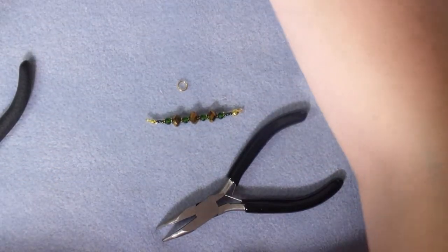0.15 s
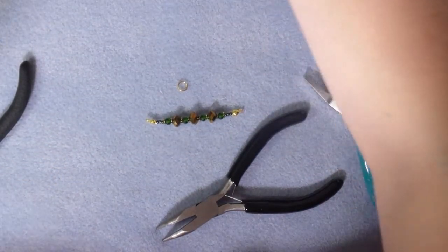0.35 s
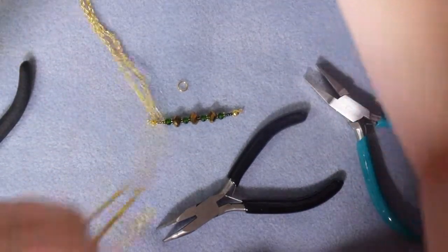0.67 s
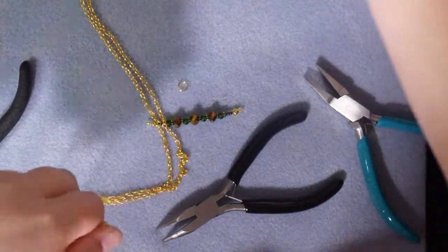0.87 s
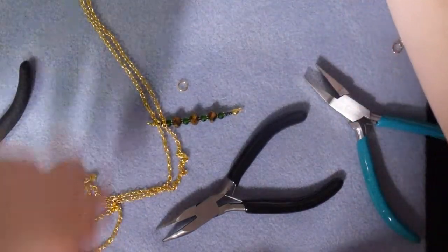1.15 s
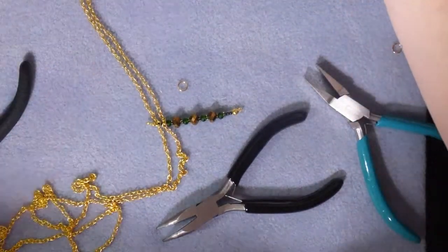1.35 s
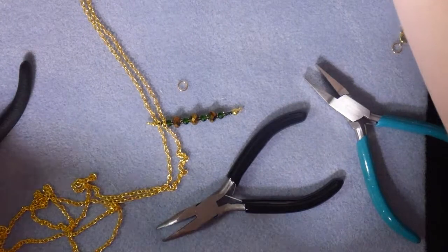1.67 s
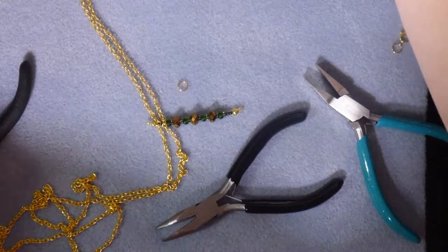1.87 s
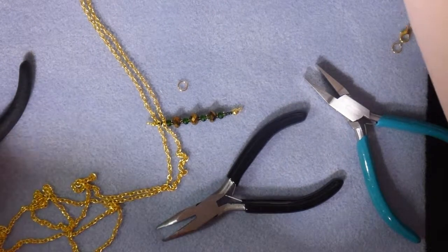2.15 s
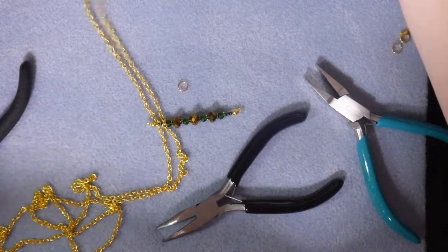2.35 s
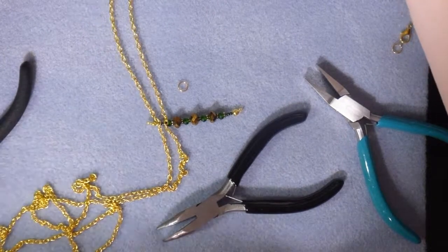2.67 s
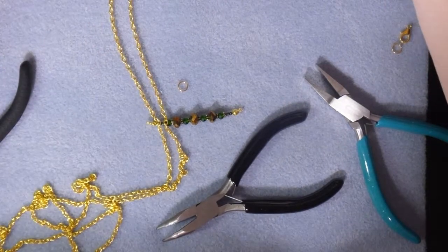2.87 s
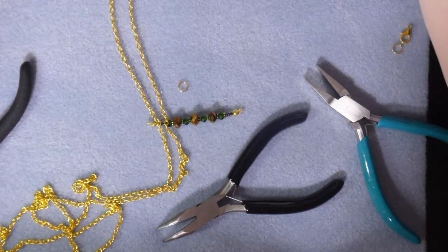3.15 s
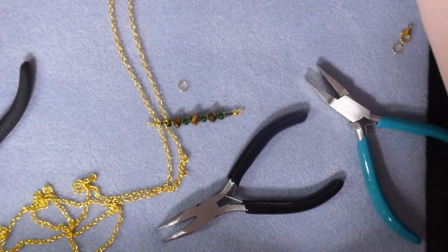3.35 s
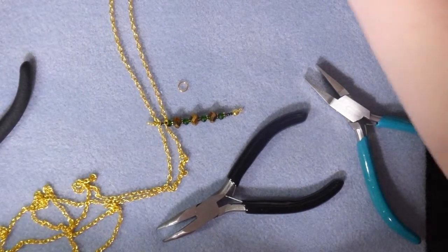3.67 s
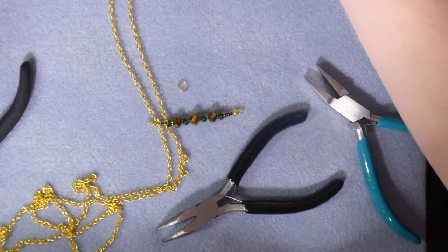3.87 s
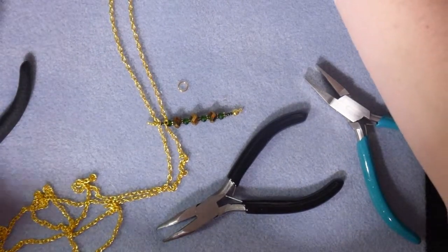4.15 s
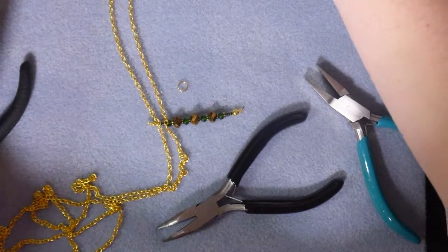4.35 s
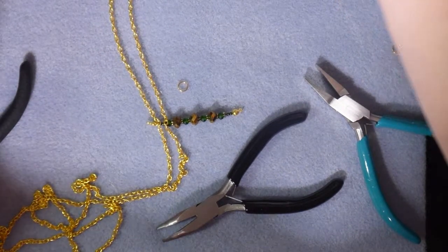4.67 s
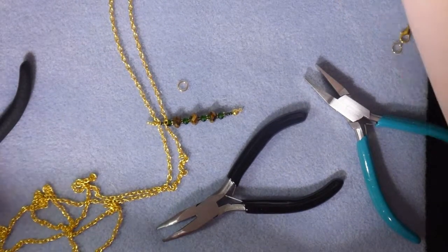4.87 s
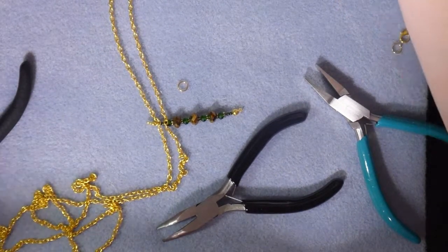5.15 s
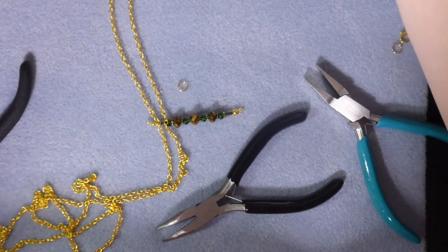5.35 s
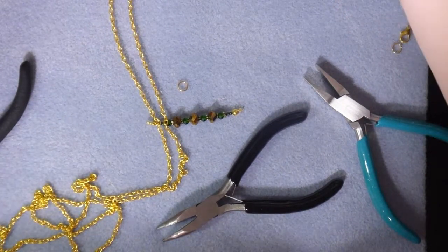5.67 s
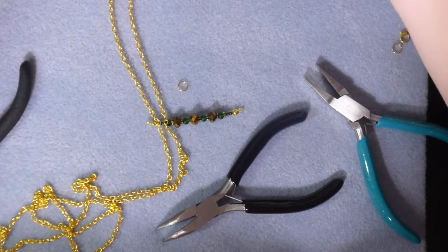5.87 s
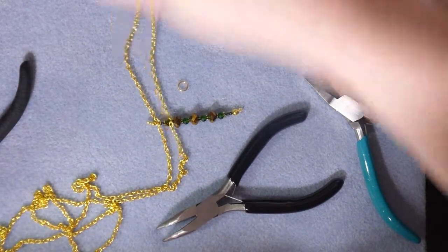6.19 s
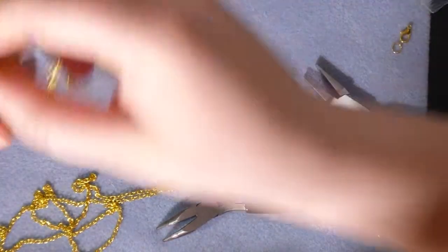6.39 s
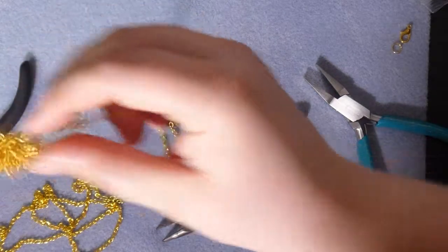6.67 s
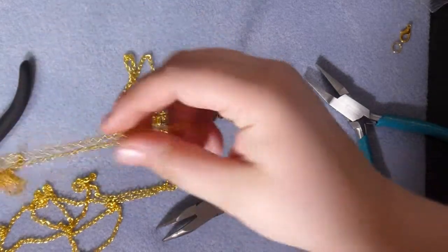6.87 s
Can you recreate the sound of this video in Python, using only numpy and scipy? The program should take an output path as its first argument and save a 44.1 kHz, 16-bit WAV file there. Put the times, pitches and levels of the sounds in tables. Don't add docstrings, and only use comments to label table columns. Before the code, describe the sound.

Someone handles a fine metal chain on a padded wooden table. Dense tiny ticks, cloth hiss and sleeve brushing mix with hollow taps from hands and tools. The busy start gives way to sparser shuffling; a rattle and hard knock come midway, then more clinking, a sharp snap and a burst of knocks. The end is mostly quiet room air, heard close and dry with faint hiss.

```python
import sys
import numpy as np
from scipy import signal
from scipy.io import wavfile
from scipy.ndimage import uniform_filter1d

SR = 44100
rng = np.random.default_rng(int(sys.argv[2]) if len(sys.argv) > 2 else 0)


def gain_from_decibels(decibels):
    exponent = np.asarray(decibels, float) / 20
    return 10 ** exponent


def pcm_store(signal):
    levels = np.round(np.clip(np.atleast_2d(signal), -1, 1) * 32767)
    wavfile.write(sys.argv[1], SR, levels.astype(np.int16).T)


N = 309582

# (frequency [Hz], level [dB per Hz])
AIR_COLOUR = [(15, -54), (25, -13), (59, -19.5), (137, 3), (354, -0.5), (607, 3.5), (2410, -7), (3720, -10),
              (8140, -13.5), (10400, -15), (11600, -17.5), (13200, -36), (14800, -19), (16000, -73)]
# (frequency [Hz], correlation [-1 to 1])
AIR_LIKENESS = [(60, 0.82), (240, 0.3), (950, -0.88), (3770, 0.009), (15000, 0.99)]
# (frequency [Hz], t60 [s])
ROOM_DECAY = [(200, 0.033), (700, 0.17), (2500, 0.1), (6000, 0.074), (12000, 0.072)]
# (frequency [Hz], level [dB per Hz])
LINK_COLOUR = [(1500, -46.5), (2900, -20), (3600, -21.5), (5270, -14), (7600, -14.5), (9100, -9.5),
               (9830, -3), (11800, -5.5), (13500, -18), (15000, -34), (15800, -41), (16000, -71)]
# (frequency [Hz], level [dB per Hz])
CLOTH_COLOUR = [(2200, -16), (3000, -9), (3450, 4), (4300, 5), (5500, -1.5), (7860, -3), (9000, -2),
                (11700, -37)]
# (frequency [Hz], level [dB per Hz])
SLEEVE_COLOUR = [(500, -18), (900, -6.5), (1200, -5), (1400, -6.5), (1750, -11), (2500, -15), (3200, -13.5),
                 (5000, -72.5)]
# (frequency [Hz], level [dB per Hz])
SNAP_COLOUR = [(290, -42.5), (500, -6.5), (785, -14.5), (936, -5.5), (1060, -8), (1200, -7.5),
               (2820, -19.5), (3580, -9), (5410, -17.5), (6780, -20), (10000, -33), (13000, -31),
               (22000, -120)]
TABLE_MODE_HZ = [118, 155, 225, 285, 350, 495, 585, 675, 810, 940, 1070, 1200, 1380, 1520]
# (level [dB], t60 [s])
TABLE_MODES = [(-33, 0.52), (-10, 0.17), (-10.5, 0.25), (-8.5, 0.13), (6, 0.088), (4.5, 0.028), (3, 0.073),
               (2.5, 0.079), (-7, 0.085), (-2.5, 0.093), (-9, 0.075), (-15.5, 0.087), (-21.5, 0.074),
               (-30, 0.053)]
# (peak time [s], rise [s], fall [s], links [dB])
CHAIN_SHAKES = [(.645, 0.0099, 0.026, -42), (.826, 0.032, 0.11, -40.5), (2.636, 0.025, 0.084, -38),
                (2.84, 0.14, 0.084, -40), (3.335, 0.048, 0.13, -26), (3.59, 0.051, 0.24, -57),
                (4.075, 0.3, 0.037, -47.5), (2.96, .1, 0.6, -63), (5.07, .1, .1, -41),
                (5.15, 0.081, 0.1, -36.5), (5.31, 0.028, 0.043, -41), (5.56, 0.12, 0.11, -42.5),
                (5.645, 0.064, 0.075, -29), (5.73, 0.15, 0.14, -28), (6.04, 0.15, 0.075, -46.5)]
# (peak time [s], rise [s], fall [s], links [dB], cloth [dB re links])
CHAIN_DRAGS = [(.001, .05, 0.22, -36, -2.5), (.24, 0.13, 0.26, -45, -12), (.33, .2, 0.1, -44, 1),
               (.46, 0.16, 0.18, -47, -7), (.745, 0.11, 0.16, -42.5, -2.5), (1.05, 0.68, 0.19, -49, -9.5),
               (1.55, 1, .14, -58.5, -6), (1.92, 0.084, 0.24, -46.5, -5.5), (2.33, 0.066, 0.59, -40, -5.5),
               (2.5, .42, .13, -37, -4), (3.942, 0.054, 0.27, -47.5, -7), (4.442, 0.23, 0.24, -50.5, 2.5),
               (4.555, 0.085, 0.34, -42, -4.5), (4.697, 0.078, 0.12, -40, -4.5),
               (4.83, 0.22, 0.35, -36, -9), (5.892, 0.37, 0.12, -30, -8.5), (6.87, 0.82, 0.71, -51.5, -7)]
# (peak time [s], rise [s], fall [s], rubbing [dB])
ARM_LEANS = [(.09, 0.37, 0.19, -32.5), (.33, 0.24, 0.093, -33), (.43, 0.052, 0.15, -42.5),
             (1.04, 0.068, 0.062, -40), (1.93, 0.099, 0.78, -44.5), (3.745, .02, .12, -33),
             (3.8, 0.18, 0.038, -47), (3.495, .05, .06, -47), (3.94, 0.026, .1, -40),
             (4.08, 0.26, 0.06, -47), (5.98, 0.15, 0.14, -40)]
# (peak time [s], rise [s], fall [s], rubbing [dB], sleeve [dB re rubbing])
ARM_SWEEPS = [(.002, .05, 0.061, -40.5, 2.5), (.6, 1, 0.45, -59.5, 6), (.76, 0.13, 0.088, -50, -6),
              (.95, 1, 0.71, -60.5, -2), (1.58, 0.29, 0.61, -63, -12), (1.91, .06, .15, -54, 6),
              (2.33, .2, .1, -52, 4), (2.525, .1, .08, -50, 5), (5.87, .06, .06, -52, 10),
              (2.486, 0.41, 0.21, -40.5, -3.5), (2.746, 0.13, 0.36, -51, -5.5),
              (3.34, 0.078, 0.18, -45, -3.5), (4.3, 0.12, 0.37, -49, -2.5), (4.46, 0.36, 0.25, -48, -4),
              (4.555, 0.12, 0.27, -50, 7.5), (4.72, 0.14, 0.59, -49.5, 4), (5.134, 0.047, 0.08, -52.5, 2.5),
              (5.5, 0.2, 0.22, -61.5, 3), (5.66, 0.17, 0.51, -50, 3), (5.899, 0.13, 0.063, -40, 1),
              (6.12, 0.18, 0.22, -68, 11), (6.85, 0.64, 0.94, -67.5, 3)]
# (time [s], level [dB], centre [Hz])
TOOL_SLIDES = [
    [(0, -50, 4400), (.15, -55.5, 4470), (.33, -53, 4470), (.5, -55, 4570), (.68, -55, 4520)],
    [(.3, -62, 1990), (.68, -63, 2057)],
    [(5.5, -61, 3090), (6.22, -59, 3055)],
    [(6.03, -58, 3900), (6.22, -67, 3800)],
    [(4.6, -55, 1250), (5.05, -58.5, 1249)],
]
TOOL_SLIDE_WIDTHS = [277, 150, 200, 350, 90]
# (time [s], peak [dB], hardness [dB per octave], damping [factor], deep boom [dB])
HARD_RAPS = [(0.014, -25, -1, 0.73, 1), (.042, -30, 1, .6, -5), (0.054, -22, 0, 0.84, -3),
             (0.066, -22, -0.5, 0.42, -5.5), (.084, -25, 2, .5, -6), (0.104, -24, 2, 0.46, -3),
             (0.142, -23.5, -2, 0.5, 0), (.158, -24.5, 0, .8, 1), (.27, -28, -1, .8, -1),
             (.425, -34, 2, 1.2, 1), (1.0157, -25.5, 3.5, 1.1, 9), (1.038, -25.5, 0, 1.15, 8),
             (1.565, -47.5, 1, 0.9, -1), (1.9, -37, 10, 0.76, 7), (2.0766, -18, 1, 1.5, -0.5),
             (2.2, -34.5, 3.5, 0.46, 2), (2.45, -35, 4, 0.59, 6), (2.522, -32.5, 10, .7, 3),
             (2.62, -42.5, 2, 1.1, -4), (2.718, -45, 0, 1.2, -0.5), (3.264, -46, 1, 1.3, 0),
             (3.672, -51, -3, .8, 0), (3.7155, -9, 2.5, 1.47, -7.5), (3.848, -43, 1, 1.7, -2),
             (3.861, -35, -9.5, 1.8, -2), (3.927, -21, 3, 2.5, -5), (4.173, -43, 2.5, 1.3, 0),
             (4.296, -23.5, -3.5, 1.5, 0.5), (4.314, -27, -2, 0.84, -0.5), (4.745, -37, 8, 0.56, 2),
             (5.132, -39, 5, 0.82, -0.5), (5.555, -40, 6, 1.2, -4), (5.61, -40, 3, 1.2, -3),
             (5.676, -36.5, 4, 0.95, -3), (5.798, -42, 6, 0.89, -3), (5.873, -16, 3.5, 0.82, -1),
             (5.894, -24, 6, 2.6, 3), (5.935, -15.5, 3, 1.56, -3), (6.063, -30.5, 3, 2.1, -4),
             (6.787, -43, 6, 4.4, 0)]
# (time [s], peak [dB], hardness [dB per octave])
SOFT_BUMPS = [(0.222, -24, -5), (0.304, -21, -5), (0.322, -25, -4), (0.362, -33, -11), (0.384, -24.5, -7),
              (0.684, -35, -2.5), (.993, -33.5, -3.5), (.972, -43, -7), (1.687, -28, -8.5),
              (1.782, -33.5, -10), (1.968, -25.5, -7.5), (3.21, -42.5, -3.5), (3.314, -19.5, -6),
              (4.595, -37, -7)]
# (time [s], peak [dB], frequency [Hz], t60 [s])
TABLE_THUDS = [(1.692, -28.5, 226.6, 0.18), (2.1, -36, 336, 0.13), (1.972, -34, 324, 0.32),
               (3.318, -9.5, 306, 0.039), (3.7195, -17, 675, 0.056), (3.72, -19, 935, 0.065),
               (3.726, -22, 800, .08), (3.724, -24, 500, .09), (3.73, -33, 1190, .09),
               (3.934, -30, 880, .06), (.05, -24, 670, .15), (.085, -25, 680, .12), (.322, -24, 290, .08),
               (5.878, -25, 280, .08), (3.722, -24, 298, 0.08), (3.863, -34, 210, 0.083),
               (3.32, -20, 480, 0.07), (1.7, -34, 520, 0.047), (3.93, -12, 658, 0.022),
               (2.08, -26, 617, 0.059), (4.595, -36, 304, 0.067), (.365, -19.5, 330, 0.11),
               (1.695, -37, 115.6, 0.28)]
# (time [s], peak [dB], t60 [s])
LINK_TICKS = [(0.4695, -32, 0.05), (0.4895, -28.5, 0.04), (.4998, -26, 0.054), (0.5436, -33.5, 0.05),
              (0.639, -40, 0.059), (.823, -31, .05), (0.8574, -31, 0.04), (.878, -33, .04),
              (1.1018, -31, 0.05), (1.112, -36, .04), (1.187, -41, .05), (1.947, -38, .05),
              (2.054, -35.5, 0.048), (2.17, -31.5, 0.086), (2.316, -31.5, .06), (2.6172, -36, .05),
              (2.65, -30, .05), (2.7412, -34, .04), (2.816, -32, .05), (2.845, -31, .04),
              (3.13, -39, 0.024), (3.2725, -42, .04), (3.278, -38, .04), (3.2947, -33, .04),
              (3.312, -25, .04), (3.334, -22, .04), (3.361, -14.5, 0.04), (3.377, -22, .05),
              (3.395, -27, .05), (3.431, -25.5, 0.07), (3.44, -25, 0.083), (3.477, -32.5, 0.047),
              (3.57, -44, .05), (3.5965, -40, 0.061), (3.7954, -42, 0.07), (3.843, -44.5, .04),
              (3.9098, -32.5, 0.071), (4.24, -46, 0.056), (4.427, -37, .06), (4.5358, -25.5, 0.049),
              (4.599, -32, .06), (4.668, -31, .04), (4.693, -27, 0.044), (4.8647, -18, 0.054),
              (4.877, -19.5, 0.053), (4.939, -33, .04), (4.975, -30, .04), (5.07, -26, 0.074),
              (5.116, -22, 0.04), (5.125, -21.5, .05), (5.1352, -19, 0.059), (5.2704, -42, .04),
              (5.305, -25, 0.037), (5.4655, -35, 0.052), (5.4914, -39, .05), (5.528, -29.5, 0.057),
              (5.614, -13, 0.053), (5.681, -21, .06), (5.686, -15, .09), (5.799, -21.5, .06)]
# (time [s], bright peak [dB], dull part [dB re peak], ring [Hz], t60 [s])
CHAIN_STRIKES = [(0.2071, -19.5, -12, 4280, 0.09), (0.417, -26.5, -8, 4540, 0.086),
                 (0.682, -7, -16.5, 6400, 0.17), (0.8111, -36, -3.5, 4100, 0.37),
                 (1.039, -29.5, -8, 6500, 0.055), (1.546, -45, 5.5, 3060, 0.14),
                 (2.632, -30, -8.5, 3890, 0.11), (2.7555, -26, -9.5, 5500, 0.069),
                 (3.349, -17, -14.5, 5800, 0.045), (3.719, -37.5, 2.5, 2880, 0.096),
                 (4.299, -26, 7.5, 5500, 0.034), (4.3106, -35, 14.5, 4900, 0.1),
                 (4.406, -46.5, 16, 3500, 0.1), (4.7468, -36, 11, 3400, 0.048),
                 (4.814, -28, -10, 3700, 0.072), (5.0583, -32, -11, 4370, 0.055),
                 (5.2943, -14, -19.5, 6060, 0.048), (5.556, -6.5, -23, 4400, 0.043),
                 (6.001, -30.5, -2, 4140, 0.13), (6.026, -23.5, -7.5, 6960, 0.13)]
# (time [s], peak [dB],
# frequency [Hz], t60 [s])
PINGS = [(3.7195, -46, 1920, .04), (3.7195, -47, 2250, .03), (3.7195, -45, 2600, 0.027),
         (3.7195, -45, 3600, .02), (2.081, -54, 2750, .03), (2.081, -46, 4400, .03),
         (1.9, -56, 2000, .03), (2, -56, 1500, .03), (2.633, -44.5, 3890, .06),
         (4.3, -19.5, 3400, 0.03), (4.3, -23, 3720, .035), (4.2995, -20.5, 4100, 0.024),
         (4.3, -24, 5150, .025), (4.2992, -28.5, 6330, 0.019), (4.7475, -26.5, 3480, 0.028),
         (4.75, -34.5, 1620, 0.03), (4.748, -33, 1200, .04), (5.559, -29.5, 4180, 0.03),
         (5.615, -30.5, 4400, 0.027), (5.685, -33.5, 3020, 0.044), (5.74, -38, 4050, .08),
         (5.8, -38, 4350, .08), (5.864, -36, 4150, 0.1), (5.891, -33, 4200, 0.096)]

STROKE_DROP_DB, STROKE_ROUND = 22, 1.162
SHAKE_CLOTH_DB, LEAN_SLEEVE_DB = -16, -14.5
REST_LINKS_DB, REST_CLOTH_DB, REST_RUB_DB, REST_SLEEVE_DB = -72, -74.5, -70, -83
BOOM_HZ, BOOM_OCTAVES = 345, .2


def evened(x):
    return x / np.sqrt(np.mean(x ** 2) + 1e-20)


def read(points, hz):
    f, value = np.transpose(points)
    return np.interp(np.log(hz + 1), np.log(f + 1), value)


def add(mix, s, sound):
    part = mix[:, round(s * SR):][:, :sound.shape[-1]]
    part += sound[..., :part.shape[1]]


def causal(points):
    hz = abs(np.fft.fftfreq(2048, 1 / SR))
    log_gain = np.log(gain_from_decibels(np.maximum(read(points, hz), -100)))
    return evened(np.fft.ifft(np.exp(np.conj(signal.hilbert(log_gain)))).real[:1024])


def through(ticks, response):
    return evened(signal.oaconvolve(ticks, response[None])[:, :N])


def swarm(per_s, spread_db, clump_db, clump_s, wide):
    clumps = evened(uniform_filter1d(rng.standard_normal(N), max(int(clump_s * SR), 2)))
    size_db = spread_db * np.minimum(rng.exponential(1, N), 3.2) + clump_db * np.clip(clumps, -2, 2)
    ticks = gain_from_decibels(size_db) * rng.choice([-1., 1.], N) * (rng.random(N) < per_s / SR)
    place = wide * rng.uniform(-0.96, 1, N)
    return np.array([ticks * (1 + place), ticks * (1 - place)])


def strokes(rows, rest_db, more_db=0, column=None):
    t = np.arange(0, N + 64, 64) / SR
    power = gain_from_decibels(rest_db) ** 2
    for row in rows:
        peak, rise, fall, db = row[:4]
        away = np.where(t < peak, (peak - t) / max(rise, .005), (t - peak) / max(fall, .005))
        share_db = 0
        if column is not None:
            share_db = row[column] if len(row) > column else more_db
        power = power + gain_from_decibels(db + share_db - STROKE_DROP_DB * away ** STROKE_ROUND) ** 2
    return np.interp(np.arange(N) / SR, t, np.sqrt(power))


def table_ring(damping, hardness_db, shift, boom_db=0):
    hz = np.array(TABLE_MODE_HZ)[:, None]
    db, t60 = np.transpose(TABLE_MODES)[:, :, None]
    t = np.arange(6000) / SR
    boom = boom_db * np.exp(-(np.log2(hz / BOOM_HZ) / BOOM_OCTAVES) ** 2)
    tilt_db = hardness_db * np.log2(hz / 500) + boom
    modes = gain_from_decibels(db + tilt_db - 60 * t * damping / t60) * np.sin(2 * np.pi * hz * shift * t)
    onset = 1 - np.exp(-(t / .0022) ** 2)
    return modes.sum(0) * onset * (1 + 2.2 * np.exp(-t / .005))


def air():
    frames, hz = N // 256 + 5, np.fft.rfftfreq(1024, 1 / SR)
    a, b, c, d, patches = rng.standard_normal((frames, 513, 5)).T
    patches = evened(uniform_filter1d(uniform_filter1d(patches, 12, 0), 14, 1))
    same = np.clip(read(AIR_LIKENESS, hz), -1, 1)[:, None]
    left = a + 1j * b
    right = same * left + np.sqrt(1 - same ** 2) * (c + 1j * d)
    z = np.array([left, right]) * gain_from_decibels(read(AIR_COLOUR, hz)[:, None] + 1.7 * patches)
    return gain_from_decibels(-53.5 - 3.5) * evened(signal.istft(z, nperseg=1024, noverlap=768)[1][:, :N])


def links():
    ticks = swarm(per_s=4500, spread_db=-6.0, clump_db=2.0, clump_s=0.0038, wide=0.69)
    return strokes(CHAIN_SHAKES + CHAIN_DRAGS, REST_LINKS_DB) * through(ticks, causal(LINK_COLOUR))


def ringing():
    ticks = swarm(per_s=700, spread_db=4.5, clump_db=1.5, clump_s=0.015, wide=0.63)
    t = np.arange(2000) / SR
    pitches = rng.uniform(6500, 13000, size=20)
    which, out = rng.integers(0, len(pitches), N), np.zeros((2, N))
    for k, hz in enumerate(pitches):
        tone = gain_from_decibels(read(LINK_COLOUR, hz) - 60 * t / .02) * np.sin(2 * np.pi * hz * t)
        out += signal.oaconvolve(ticks * (which == k), tone[None])[:, :N]
    return gain_from_decibels(-10) * strokes(CHAIN_SHAKES + CHAIN_DRAGS, REST_LINKS_DB) * evened(out)


def cloth():
    ticks = swarm(per_s=4000, spread_db=-4.5, clump_db=1.5, clump_s=0.015, wide=0.17)
    gain = strokes(CHAIN_SHAKES + CHAIN_DRAGS, REST_CLOTH_DB, SHAKE_CLOTH_DB, column=4)
    return gain * through(ticks, causal(CLOTH_COLOUR))


def slides():
    out = np.zeros((2, N))
    for rows, width_hz in zip(TOOL_SLIDES, TOOL_SLIDE_WIDTHS):
        s, db, hz = np.transpose(rows)
        t = np.arange(s[0], s[-1], 1 / SR)
        turn = np.exp(2j * np.pi * np.cumsum(np.interp(t, s, hz)) / SR)
        slow = signal.lfilter(*signal.butter(2, width_hz, fs=SR), rng.standard_normal((2, len(t))))
        hiss = evened(((slow[0] + 1j * slow[1]) * turn).real)
        gain = gain_from_decibels(np.interp(t, s, db) + 0.5) * signal.windows.tukey(len(t), .1)
        add(out, s[0], (gain * hiss)[None])
    return out


def rubbing():
    slips = swarm(per_s=1500, spread_db=1.0, clump_db=-1.5, clump_s=.015, wide=0.063)
    ring = table_ring(damping=1.73, hardness_db=2.5, shift=0.98, boom_db=1.5)
    return strokes(ARM_LEANS + ARM_SWEEPS, REST_RUB_DB) * through(slips, ring)


def sleeve():
    ticks = swarm(per_s=5000, spread_db=-0.5, clump_db=2.1, clump_s=0.02, wide=0.1)
    gain = strokes(ARM_LEANS + ARM_SWEEPS, REST_SLEEVE_DB, LEAN_SLEEVE_DB, column=4)
    return gain * through(ticks, causal(SLEEVE_COLOUR))


def knocks():
    out = np.zeros((2, N))
    bumps = [(*row, 1.2, 0) for row in SOFT_BUMPS]
    blows = sorted(bumps + HARD_RAPS)
    spots = rng.uniform(.98, 1.02, (len(blows), len(TABLE_MODES), 1))
    delay_s = 0.003026
    for (s, db, hardness_db, damping, boom_db), shift in zip(blows, spots):
        ring = table_ring(max(damping, .2), hardness_db, shift, boom_db)
        add(out, s + delay_s, gain_from_decibels(db) * ring[None] / abs(ring).max())
    return out


def thuds():
    out, t = np.zeros((2, N)), np.arange(8000) / SR
    onset = 1 - np.exp(-t / 0.0066)
    for s, db, hz, t60 in TABLE_THUDS:
        turns = hz * (t + 0.00075 * (1 - np.exp(-t / 0.0075)))
        add(out, s, (gain_from_decibels(db - 60 * t / t60) * np.sin(2 * np.pi * turns) * onset)[None])
    return out


def clinks():
    out, t = np.zeros((2, N)), np.arange(5000) / SR
    bright, dull = causal(LINK_COLOUR), causal(SNAP_COLOUR)
    ticks = [(s, db, -21.5, 5500, t60) for s, db, t60 in LINK_TICKS]
    for s, db, dull_db, hz, t60 in sorted(ticks + CHAIN_STRIKES):
        fall = gain_from_decibels(-60 * t / max(t60, .01))
        rattle = rng.standard_normal((3, len(t))) * gain_from_decibels(0.91 * rng.standard_normal(len(t))) * fall
        rattle[:2, 0] += 3.5
        ring = np.sin(2 * np.pi * hz * t) * gain_from_decibels(-60 * t / .012)
        high, aside = signal.oaconvolve(rattle[::2], bright[None])
        low = signal.oaconvolve(rattle[1], dull + .9 * ring[:len(dull)])
        sound = high / abs(high).max() + gain_from_decibels(dull_db) * low / abs(low).max()
        aside *= 0.28 / abs(high).max()
        add(out, s, gain_from_decibels(db) * np.array([sound + aside, sound - aside]))
    return out


def pings():
    out, t = np.zeros((2, N)), np.arange(4000) / SR
    for s, db, hz, t60 in PINGS:
        pair = np.sin(2 * np.pi * hz * t) + .6 * np.sin(2 * np.pi * hz * 1.045 * t)
        add(out, s, (gain_from_decibels(db - 60 * t / t60) * pair)[None])
    return out


def room(x):
    taps = np.zeros((2, 20000))
    at = np.arange(100, 19980, 20) + rng.integers(0, 20, (2, 994))
    np.put_along_axis(taps, at, rng.choice([-1., 1.], at.shape), 1)
    hz, t, z = signal.stft(taps, SR, nperseg=256)
    fall = gain_from_decibels(-60 * t / read(ROOM_DECAY, hz)[:, None])
    tail = signal.istft(z * fall, SR, nperseg=256)[1]
    return signal.fftconvolve(x.mean(0)[None], tail / np.linalg.norm(tail[0]), axes=1)[:, :N]


def scene():
    chain = links() + cloth() + sleeve() + slides() + clinks() + pings()
    wood = rubbing() + knocks() + thuds()
    wood_room = (room(wood) * [[.75], [.25]]).sum(0)
    near = chain + wood + gain_from_decibels(-7) * room(chain) + gain_from_decibels(-14) * wood_room
    no_bass = signal.butter(4, 125, "high", fs=SR, output="sos")
    return signal.sosfilt(no_bass, near + ringing()) + air()


def low_pass(x):
    return signal.sosfilt(signal.butter(12, 15900, fs=SR, output="sos"), x)


def record(dry):
    mix = dry * gain_from_decibels(np.array([[-.4], [.4]]))
    return low_pass(mix)


dry = scene()
out = record(dry)
pcm_store(out)
```